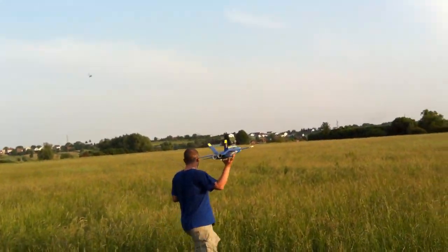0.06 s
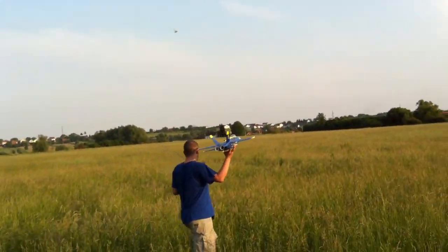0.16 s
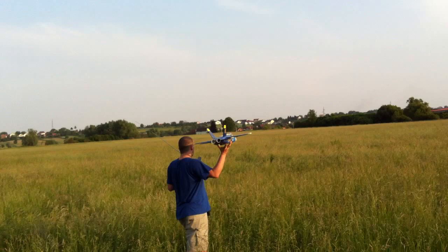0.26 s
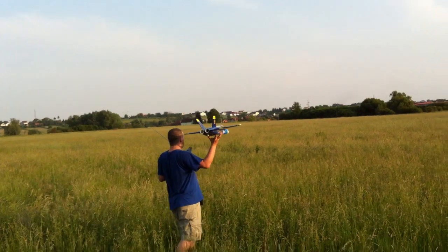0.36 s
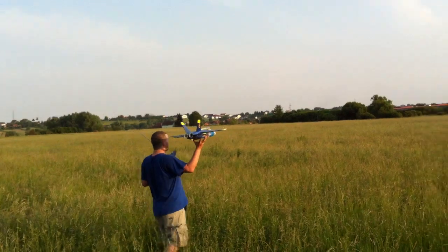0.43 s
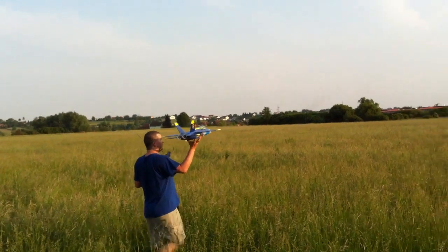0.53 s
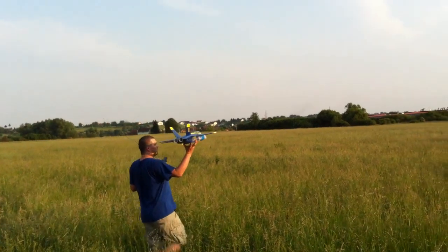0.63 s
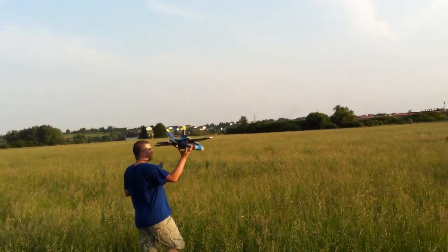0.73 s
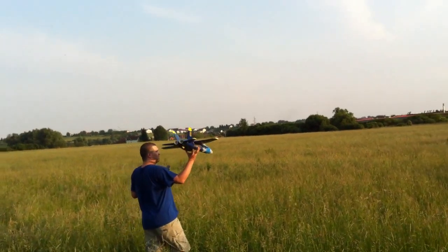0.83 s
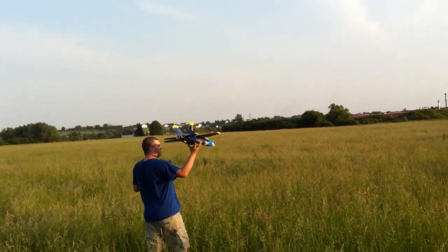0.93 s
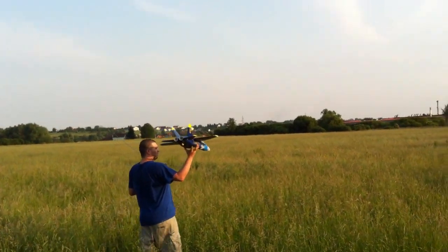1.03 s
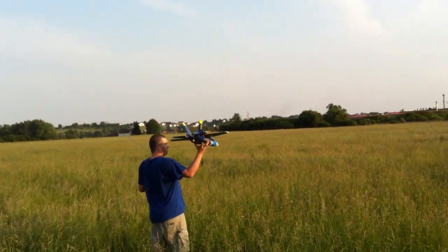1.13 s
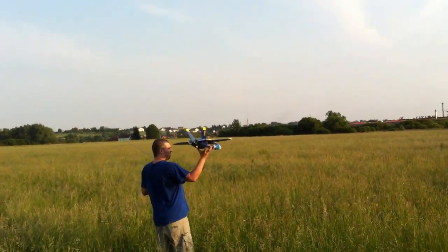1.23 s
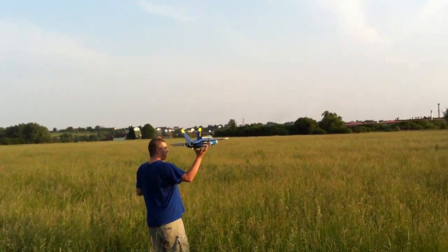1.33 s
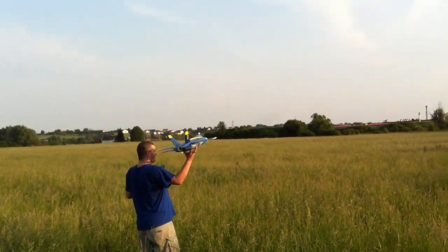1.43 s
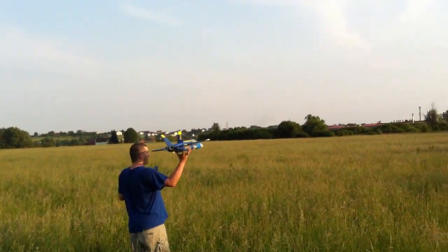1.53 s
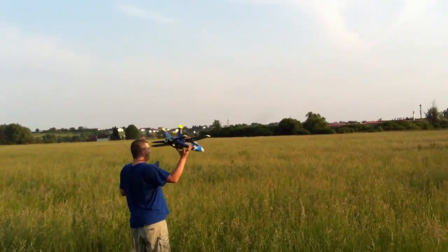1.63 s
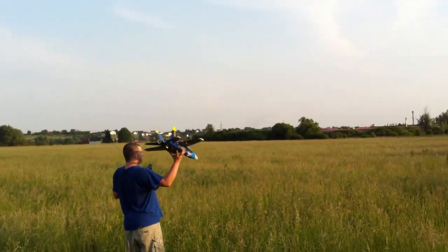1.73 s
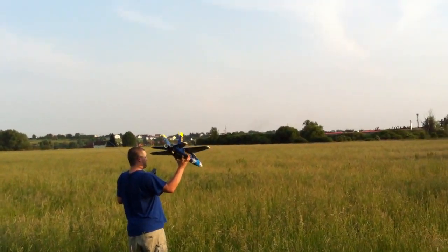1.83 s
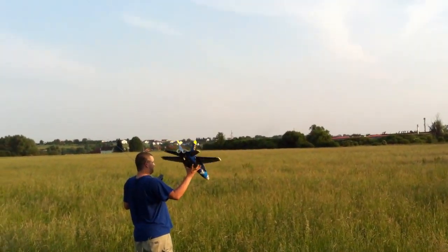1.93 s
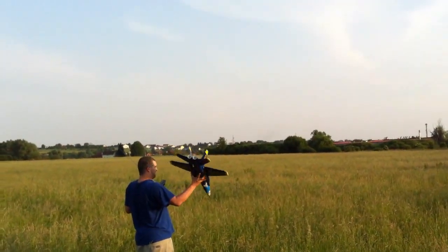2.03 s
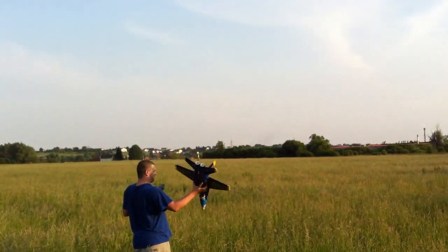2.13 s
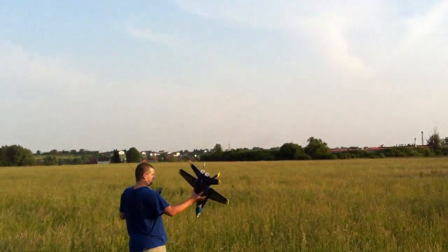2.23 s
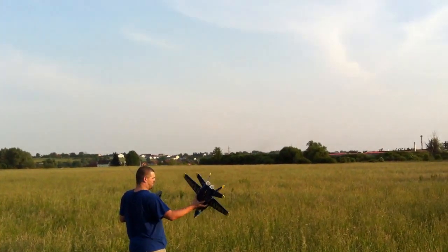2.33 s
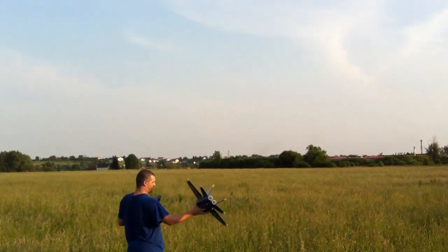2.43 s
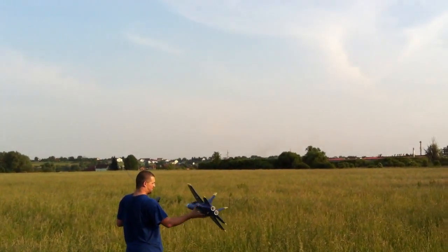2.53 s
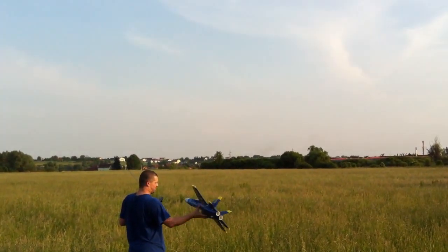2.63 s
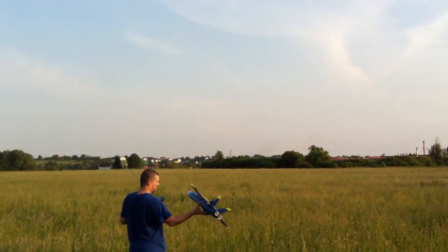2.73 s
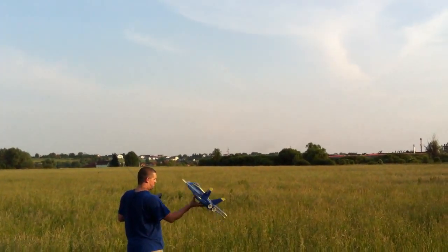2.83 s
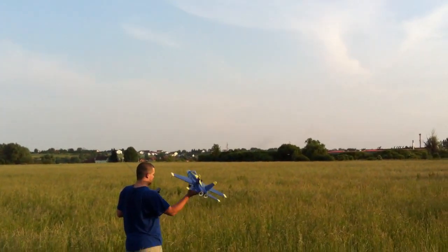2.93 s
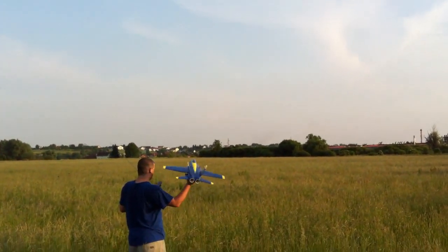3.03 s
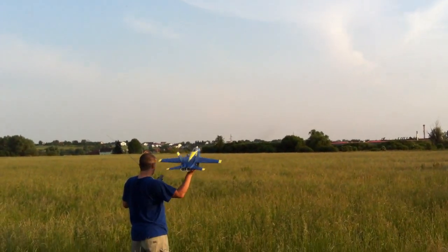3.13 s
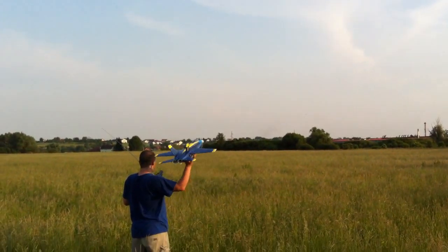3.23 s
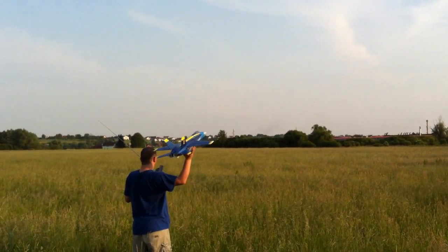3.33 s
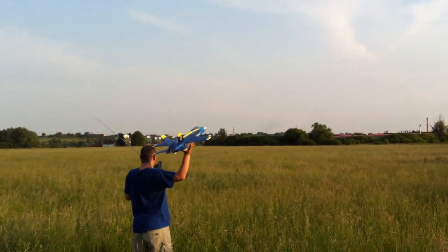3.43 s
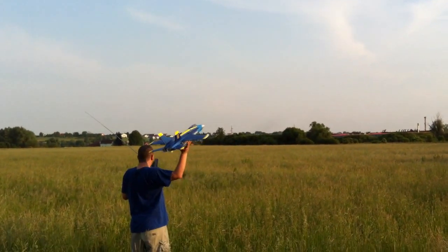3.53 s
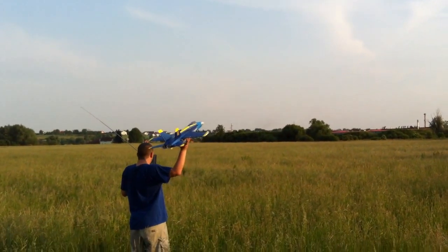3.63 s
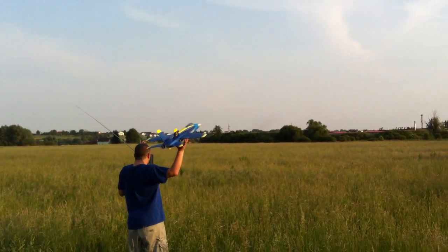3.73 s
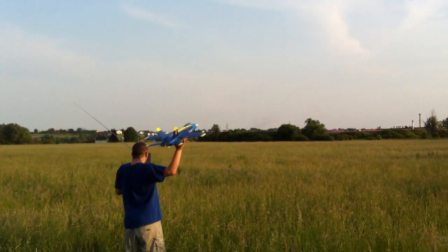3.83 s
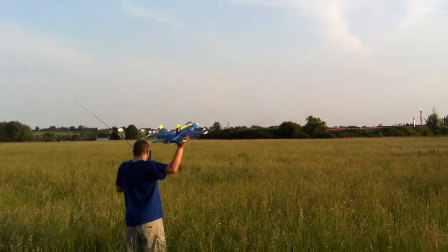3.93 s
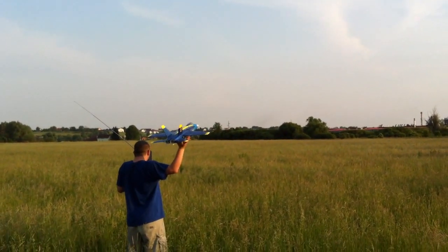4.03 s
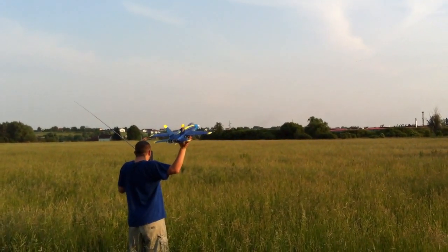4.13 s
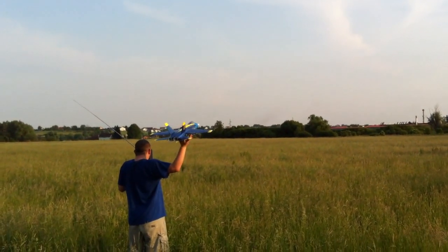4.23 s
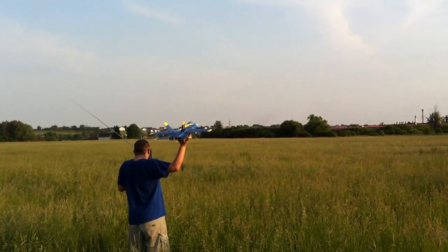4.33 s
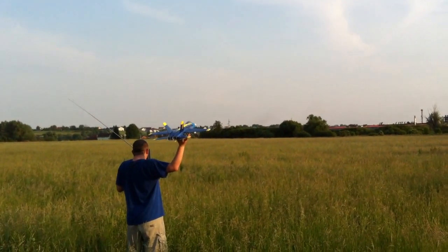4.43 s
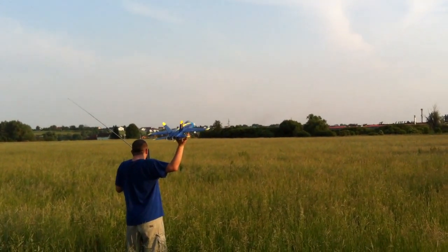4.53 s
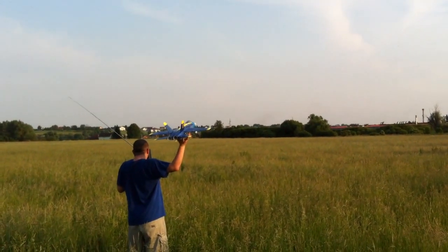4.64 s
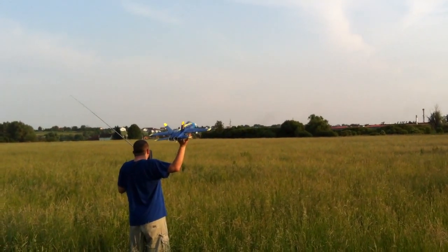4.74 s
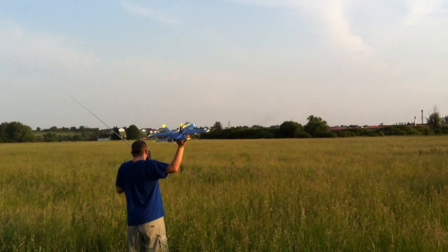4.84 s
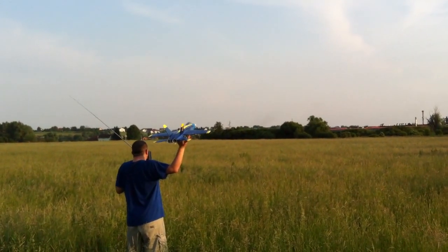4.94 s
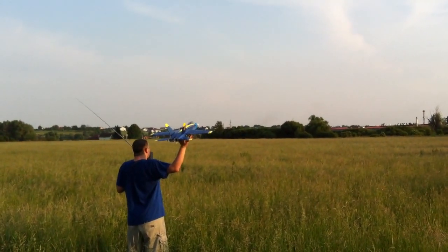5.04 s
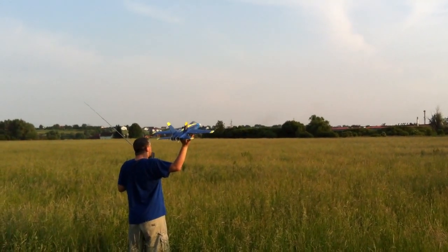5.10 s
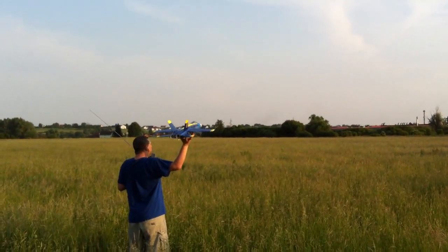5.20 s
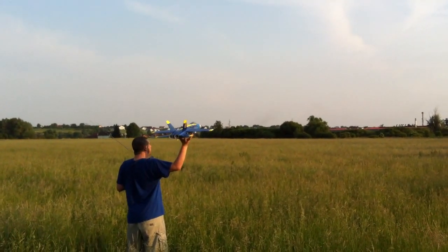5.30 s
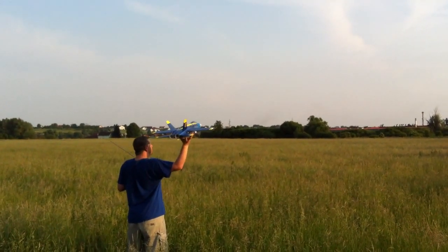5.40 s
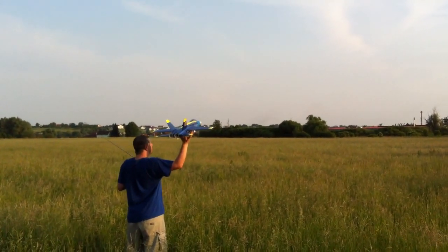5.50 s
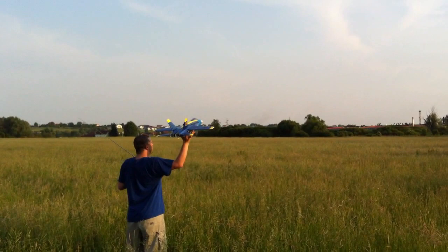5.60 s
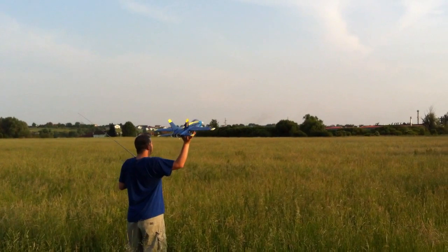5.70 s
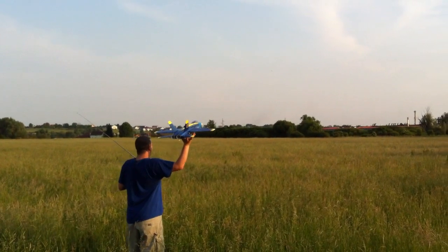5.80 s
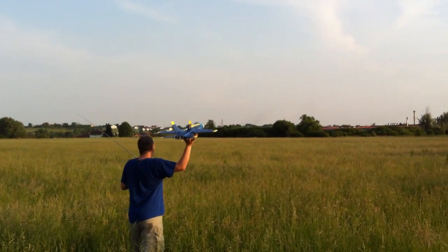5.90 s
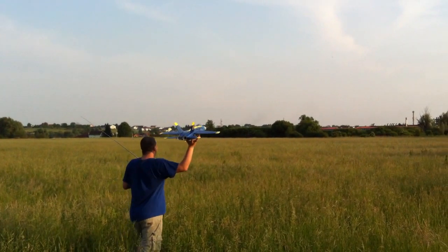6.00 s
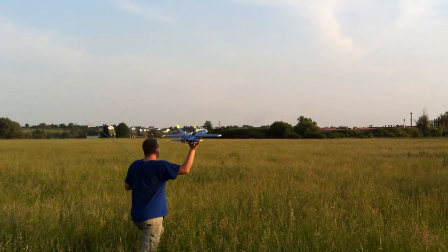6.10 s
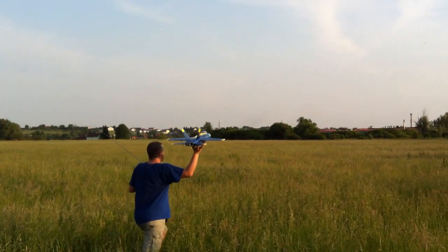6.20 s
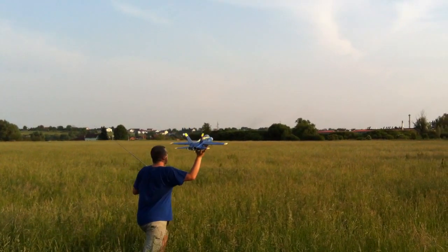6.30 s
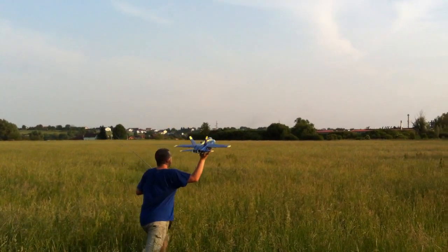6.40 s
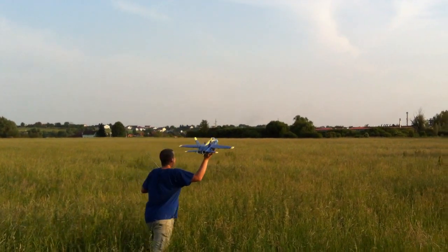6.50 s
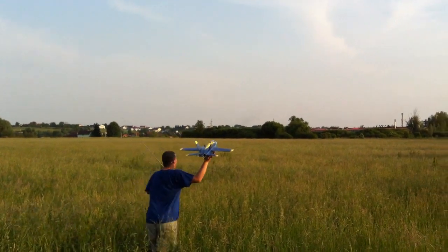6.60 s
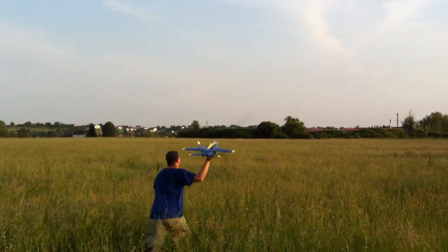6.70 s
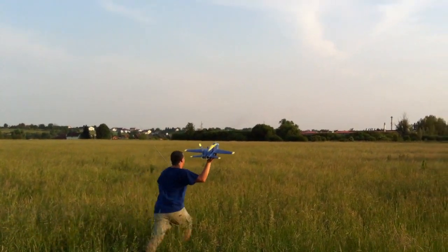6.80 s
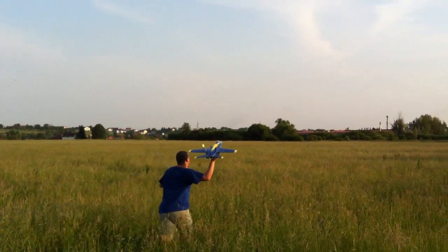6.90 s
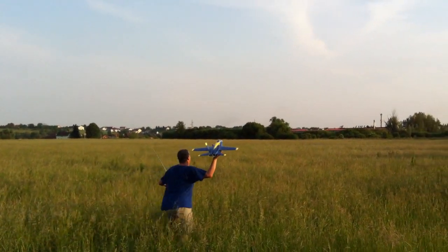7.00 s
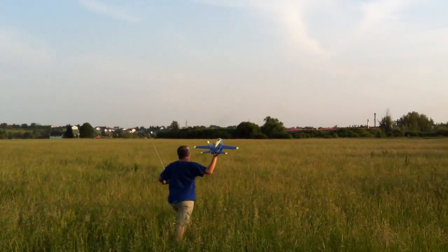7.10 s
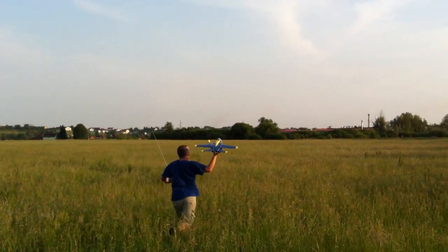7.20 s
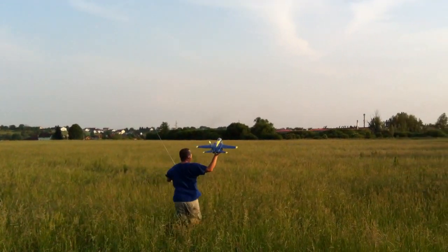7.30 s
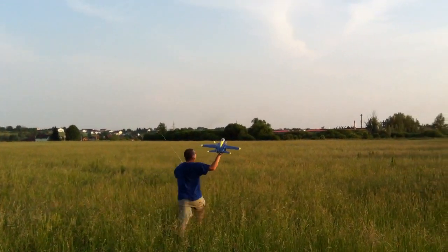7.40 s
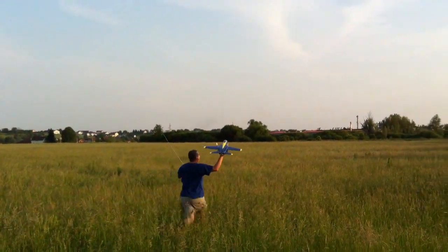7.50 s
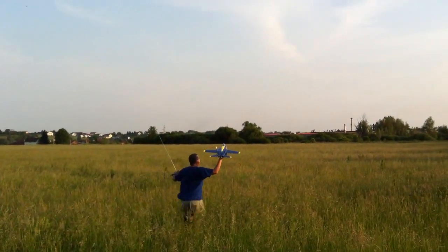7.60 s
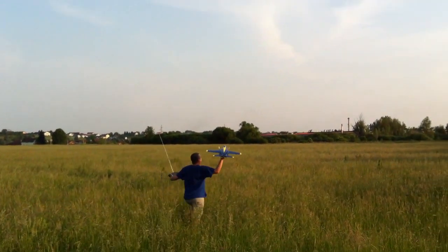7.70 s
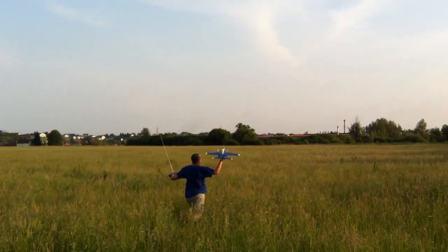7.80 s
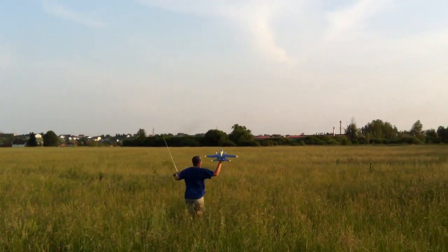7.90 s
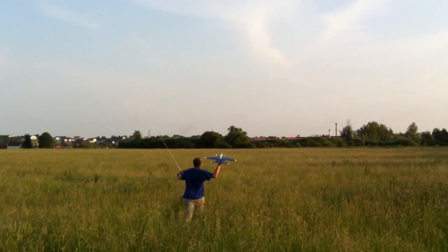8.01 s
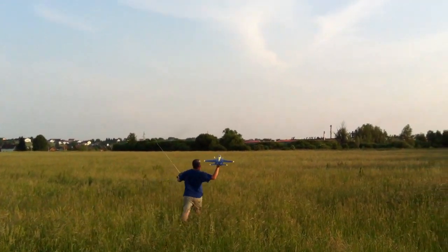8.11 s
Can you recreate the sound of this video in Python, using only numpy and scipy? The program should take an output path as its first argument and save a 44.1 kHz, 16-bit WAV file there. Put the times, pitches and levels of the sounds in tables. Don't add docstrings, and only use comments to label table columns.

```python
import sys
import numpy as np
from scipy import signal
from scipy.fft import rfft, irfft, next_fast_len
from scipy.io import wavfile
from scipy.ndimage import uniform_filter1d, map_coordinates

SR = 44100
rng = np.random.default_rng(int(sys.argv[2]) if len(sys.argv) > 2 else 0)


def wav_record(signal):
    frames = np.transpose(np.atleast_2d(signal))
    bounded = np.clip(frames, -1, 1)
    quanta = np.round(bounded * 32767).astype(np.int16)
    wavfile.write(sys.argv[1], SR, quanta)


def boost(x):
    u = np.asarray(x, float) / 20
    return 10 ** u


N = 359415
T = np.arange(N) / SR

# f/Hz, level/dB [per Hz]
FIELD_SPECTRUM = [(15, -36), (25, -13), (53, -25.5), (179, 4.5), (255, -2), (674, -0.5), (958, -8.5),
                  (1600, -24.5), (2150, -20.5), (4010, -16), (4710, -13.5), (5390, -19.5), (15900, -24)]
# peak t/s, rise t/s, fall t/s, level/dB
SWISHES = [
    (0.0, .05, 0.19, -57.5),
    (.15, 0.046, 0.069, -55.5),
    (.45, 0.1, 0.3, -51.5),
    (.78, 0.067, 0.075, -54.5),
    (1.0, 0.15, 0.17, -61),
    (1.28, 0.02, 0.047, -51),
    (1.3, 0.15, 0.19, -53.5),
    (1.62, 0.014, .03, -62),
    (2.62, 0.0067, .006, -61),
]
# peak t/s, rise t/s, fall t/s, level/dB
SCUFFS = [(.1, .1, 0.087, -64), (.24, 0.013, 0.013, -54), (.33, 0.064, 0.18, -54.5),
          (.44, 0.049, 0.13, -49), (.565, .006, 0.055, -48), (.64, .04, 0.054, -49),
          (.79, 0.05, 0.043, -53), (1.24, 0.12, 0.71, -57.5), (1.62, 0.011, 0.12, -57),
          (2.502, 0.065, 0.36, -61), (3.86, 0.063, 0.62, -57.5)]
# peak t/s, rise t/s, fall t/s, level/dB, peak f/Hz
WHOOSHES = [
    (0.469, 0.0045, .008, -52.5, 1500),
    (.565, 0.0058, .05, -51, 1360),
    (.645, .07, .07, -51.5, 1646),
    (.74, 0.055, .05, -58.5, 1649),
    (1.25, .1, .3, -63.5, 1710),
    (2.5, .12, .15, -62.5, 1630),
    (3.4, .15, .2, -67, 1720),
    (3.9, .08, .4, -62, 1820),
    (4.499, .15, .25, -64, 1776),
    (4.88, .12, .3, -60, 1696),
]
# first stroke t/s, last stroke t/s, peak level/dB
NEAR_CHIRPS = [(0.058, 0.166, -45.5), (0.327, 0.424, -45.5), (.5921, 0.694, -45.5), (.8779, 0.978, -45),
               (1.169, 1.271, -43.5), (1.608, 1.708, -43), (2.029, 2.13, -44.5), (2.286, 2.388, -44),
               (2.559, 2.657, -43.5), (2.835, 2.935, -43), (3.124, 3.156, -43.5), (3.433, 3.537, -43.5),
               (3.709, 3.8116, -43.5), (4.0003, 4.101, -44), (4.281, 4.386, -43.5), (4.6104, 4.713, -44),
               (4.9137, 5.015, -44)]
# first stroke t/s, last stroke t/s, peak level/dB, f/Hz
NEIGHBOUR_CHIRPS = [(.02, .11, -55.5, 4830), (.262, .262, -60, 4830), (.452, .452, -53, 4400),
                    (1.12, 1.155, -57, 4740), (1.35, 1.35, -58, 4830), (1.517, 1.585, -58, 4930),
                    (1.76, 1.76, -60, 4800), (1.832, 1.97, -60, 4930), (2.171, 2.2453, -52.5, 4710),
                    (2.5102, 2.5426, -51, 4700), (2.695, 2.695, -57, 4870), (2.91, 2.945, -52, 4830),
                    (2.981, 2.981, -47.5, 4700), (3.014, 3.014, -56, 4830), (3.21, 3.395, -61, 4880),
                    (3.568, 3.592, -66, 4770), (3.625, 3.653, -56.5, 4810), (3.8546, 3.8911, -51.5, 4740),
                    (3.98, 3.98, -55, 4870), (4.132, 4.1994, -51, 4680), (4.4333, 4.4682, -51, 4700),
                    (4.7538, 4.7925, -51.5, 4660), (5.0434, 5.0434, -53, 4650)]
# t/s, peak level/dB, f/Hz
TICKS = [(0.238, -47, 635), (0.306, -38.5, 1000), (0.452, -32, 4100), (0.469, -33.5, 1550),
         (0.52, -39, 3800), (0.561, -33.5, 1350), (0.603, -39, 1540), (1.281, -29, 8900), (1.615, -46, 910),
         (2.095, -52, 2800), (2.62, -51, 3200)]
# t/s, peak level/dB, f/Hz, glide [share of pitch]
LARK_NOTES = [(1.87, -69.5, 3830, -.15), (1.95, -65, 3000, .05), (2.41, -56, 3900, -0.022),
              (2.465, -57, 3500, .2), (2.62, -65, 3300, -.35), (2.945, -59, 3700, -0.11),
              (2.985, -61, 3550, .15), (3.12, -64, 3800, -.25), (3.14, -65, 2950, -.12),
              (3.2, -59, 3780, -0.16), (3.245, -58, 3530, 0.069), (3.295, -62, 3180, .25),
              (3.32, -64, 2900, -0.28), (3.385, -67, 3700, .05), (3.88, -59, 2900, -.25),
              (4.04, -64, 3800, -.2), (4.12, -58.5, 3800, -0.21), (4.155, -57, 3910, .2),
              (4.19, -68, 3200, -.15), (4.36, -59, 3730, .25), (4.44, -56, 4100, -.15),
              (4.5, -61, 3630, 0.17), (4.6, -65, 3660, 0.014), (3.84, -64, 3400, -.2),
              (4.41, -63, 3500, -.2), (4.46, -59, 3700, -.15), (4.53, -68, 3600, -.15),
              (3.33, -66, 4200, -.1), (2.925, -65, 3900, .1)]
# t/s, level/dB
WHISTLE = [
    (4.84, -41),
    (4.86, -40.5),
    (5.09, -31.5),
    (5.208, -37.5),
    (5.25, -44),
    (5.33, -56),
]
# t/s, f/Hz, level/dB
UPPER_SIDEBAND = [
    (4.87, 7970, -65),
    (4.94, 8240, -56),
    (5.08, 8940, -58),
    (5.14, 9400, -67),
]
# t/s, f/Hz, level/dB
LOWER_SIDEBAND = [
    (4.96, 6400, -79),
    (4.98, 6100, -70),
    (5.01, 5750, -69),
    (5.02, 5600, -74),
]
# f/Hz, width f/Hz, level/dB
WINDING_BUZZ = [
    (620, 180, -63.5),
    (960, 220, -59.5),
    (2090, 900, -65),
    (6520, 790, -61),
    (7740, 600, -57),
]
# t/s, shaft f/Hz, out-of-balance level/dB, blade tone level/dB; its tail faces us after 6 s
ROTOR = [(5.035, 140, -45, -65), (5.154, 325.7, -49.5, -46), (5.228, 456, -45.5, -35),
         (5.302, 582, -49, -36.5), (5.345, 640, -32, -32), (5.41, 719, -38.5, -26), (5.46, 737, -47, -39),
         (5.53, 743.5, -50.5, -29), (5.8, 742.3, -39, -28), (6.05, 736, -39, -35.5),
         (6.22, 736.7, -45.5, -36.5), (6.36, 734.5, -35, -30.5), (6.7, 731, -35, -41.5),
         (6.96, 732.8, -30.5, -43.5), (7.09, 725.3, -43, -38.5), (7.2, 724, -36, -42.5),
         (7.55, 723.3, -32.5, -39.5), (7.85, 719, -44.5, -46.5), (8.15, 714.5, -41, -41.5)]
# multiple of shaft, level/dB [over airflow], dB per halving of speed,
# dB per doubling of distance
STRONG_ORDERS = [(3, -8, 9.5, -2.5), (10, 0.1, -24, -2), (15, -4.5, -29, -9)]
# multiple of shaft, level/dB [re airflow]
WEAK_ORDERS = [(2, -16.5), (4, -14), (8, -13.5), (20, -19)]
# f/Hz, level/dB [per Hz]
AIR_SPECTRUM = [(35, -69), (60, -31.5), (307, -10.5), (502, -11), (649, -5.5), (729, -19.5), (800, -14),
                (1430, -14), (1810, -17.5), (2130, -14.5), (4200, -9), (5560, -15.5), (7350, -12.5),
                (14500, -22), (15900, -30)]
# t/s, distance/m
DISTANCE = [
    (5.6, 5.76),
    (6.3, 6.12),
    (6.8, 7.78),
    (7.3, 9.3),
    (7.8, 10.8),
    (8.15, 13.2),
]

BLADES = 5
FULL_HZ, FLOW_DB = 765, -35
FLOW_POWER, SPREAD = 2.12, 1.185
ECHO_LAG_MS, ECHO_DB, GRAZE_DB = 3.243, -8.5, 3
WHISTLE_HZ = 7920
NEAR_CRICKET_HZ = 4785
STROKE_S, QUICK_S = .035, .0035
WARMUP_DB, WARMUP_HZ, WARMUP_LEFT = -5.5, -75, 0.34
CLIMB, SAG_HZ_PER_S = .1, 330


def level(x, db):
    return x * boost(db) / np.sqrt(np.mean(x ** 2))


def curves(rows):
    s, *columns = np.transpose(rows)
    return [np.interp(T, s, column) for column in columns]


def colour(points):
    hz, db = np.transpose(points)
    size = next_fast_len(N)
    f = np.arange(size // 2 + 1) * SR / size + 1
    gain = boost(np.interp(np.log(f), np.log(hz), db))
    return level(irfft(rfft(rng.standard_normal(size)) * gain, size)[:N], 0)


def band(x, lo_hz, hi_hz, order=2):
    edges_hz = [lo_hz, min(hi_hz, .45 * SR)]
    return signal.sosfilt(signal.butter(order, edges_hz, "band", fs=SR, output="sos"), x)


def low_cut(x, hz=150, order=4):
    return signal.sosfilt(signal.butter(order, hz, "high", fs=SR, output="sos"), x)


def walk(rate):
    hold = int(SR / rate)
    held = np.repeat(rng.standard_normal(N // hold + 1), hold)
    return 1.3 * uniform_filter1d(uniform_filter1d(held, hold), hold)[:N]


def tone(hz, db):
    return np.sqrt(2) * boost(db) * np.sin(2 * np.pi * np.cumsum(hz) / SR)


def add(out, s, grain):
    i = int(s * SR)
    out[i:i + len(grain)] += grain[:N - i]


def swells(rows, rest_db):
    powers = []
    for s, rise, fall, db, *_ in rows:
        rising = np.exp(-((T - s) / rise) ** 2)
        falling = np.exp(-2 * np.maximum(T - s, 0) / fall)
        powers.append(boost(2 * db) * np.where(T < s, rising, falling))
    return np.sqrt(sum(powers) + boost(2 * rest_db)), powers


def grass():
    swish_gain, _ = swells(SWISHES, rest_db=-73.5)
    scuff_gain, _ = swells(SCUFFS, rest_db=-67)
    grains = rng.exponential(size=N // 20 + 1).repeat(20)[:N]
    crackle = boost(2.2 * np.minimum(grains, 5))
    swish = level(band(rng.standard_normal(N) * crackle, 1900, 18400, order=1), 0)
    scuff = level(band(rng.standard_normal(N), 270, 1780), 0)
    return swish * swish_gain * boost(0.48 * walk(31.5)) + scuff * scuff_gain * boost(-1.0 + 2.3 * walk(35))


def whoosh():
    gain, waves = swells(WHOOSHES, rest_db=-71.5)
    pitches = []
    for s, rise, fall, _, hz in WHOOSHES:
        climb = 1 - CLIMB * np.clip((s - T) / rise, 0, 1)
        pitches.append(hz * climb - SAG_HZ_PER_S * np.clip(T - s, 0, 2 * fall))
    centre_hz = np.average(pitches, axis=0, weights=np.add(waves, 1e-30))
    slow = level(band(rng.standard_normal((2, N)), 1, 140), 0)
    phase = 2 * np.pi * np.cumsum(centre_hz) / SR
    return (slow[0] * np.sin(phase) + slow[1] * np.cos(phase)) * gain * boost(-1.0)


def traffic():
    floor = colour(FIELD_SPECTRUM) * boost(-57 - 2.0 + 0.58 * walk(3.3))
    engine = level(band(rng.standard_normal(N), 55, 86), -77) * np.clip((1.3 - T) / 0.76, 0, 1)
    return floor + engine


def strokes(first_s, last_s, db, hz, warmup):
    k = np.arange(int(round((last_s - first_s) / STROKE_S)) + 1)
    early_s = QUICK_S * warmup * (k > 0) * (k < k[-1])
    cold = warmup * WARMUP_LEFT ** k
    times = np.linspace(first_s, last_s, len(k)) - early_s
    return zip(times, db + WARMUP_DB * cold, hz + WARMUP_HZ * cold)


def crickets():
    rows = [row for chirp in NEAR_CHIRPS for row in strokes(*chirp, NEAR_CRICKET_HZ, warmup=0.93)]
    rows += [row for chirp in NEIGHBOUR_CHIRPS for row in strokes(*chirp, warmup=0.274)]
    out = np.zeros(N)
    chance = rng.standard_normal((len(rows), 2))
    for (s, db, hz), (stretch, turn) in zip(rows, chance):
        length_s = (0.022 + 0.00069 * (db + 44.0)) * (1 + .05 * stretch)
        u = np.linspace(0, 1, int(length_s * SR))
        sag = 1.025 - 0.041 * u - 0.026 * u ** 4
        phase = 2 * np.pi * np.cumsum(hz * sag) / SR + turn * np.pi
        shape = np.sin(np.pi * u ** 1.35) ** .55
        add(out, s - .0055, boost(db) * shape * (np.sin(phase) + boost(-29) * np.sin(2 * phase)))
    chorus = level(band(rng.standard_normal(N), 4720, 4900), -70.5) * boost(4.5 * walk(28))
    out = out * boost(1.7 * walk(130))
    return out + 0.14 * np.roll(out, int(0.011 * SR)) + chorus


def ticks():
    out = np.zeros(N)
    t = np.arange(int(.02 * SR)) / SR
    cracks = rng.standard_normal((len(TICKS), len(t)))
    for (s, db, hz), crack in zip(TICKS, cracks):
        ring = np.sin(2 * np.pi * hz * t) + 0.36 * np.sin(2 * np.pi * 0.58 * hz * t)
        damped = ring * np.exp(-t * hz / 4.0)
        add(out, s, boost(db) * (damped + 0.43 * crack * np.exp(-t / 0.0011)))
    return low_cut(out, hz=280)


def lark():
    out = np.zeros(N)
    u = np.linspace(0, 1, int(0.0316 * SR))
    for s, db, hz, glide in LARK_NOTES:
        phase = 2 * np.pi * np.cumsum(hz * (1 + glide * (u - .5))) / SR
        add(out, s - .004, boost(db - 5.5) * np.sin(np.pi * u) * np.sin(phase))
    out = out * boost(2.7 * walk(150))
    return out + 0.51 * np.roll(out, int(.017 * SR)) + 0.24 * np.roll(out, int(0.046 * SR))


def controller():
    whistle_db, = curves(WHISTLE)
    gap = 1 - 0.98 * np.exp(-((T - 4.853) / 0.004) ** 2)
    on = (T > 4.841) * (T < WHISTLE[-1][0]) * gap
    whistle = tone(np.full(N, WHISTLE_HZ), whistle_db + 0.48 * walk(60))
    buzz = np.zeros(N)
    for hz, width_hz, db in WINDING_BUZZ:
        noise = band(rng.standard_normal(N), hz - width_hz / 2, hz + width_hz / 2)
        buzz += level(noise, db) * boost(5.4 * walk(40))
    buzz = buzz * np.clip((5.15 - T) / 0.077, 0, 1)
    sidebands = np.zeros(N)
    for rows in (UPPER_SIDEBAND, LOWER_SIDEBAND):
        sidebands += (T > rows[0][0]) * (T < rows[-1][0]) * tone(*curves(rows))
    return on * (whistle + buzz) + sidebands * boost(3.8 * walk(70))


def flight():
    shaft_hz = uniform_filter1d(curves(ROTOR)[0], SR // 30)
    steady = np.clip((T - 5.5) / .2, 0, 1)
    far = np.log2(curves(DISTANCE)[0] / DISTANCE[0][1])
    slow = np.log2(FULL_HZ / shaft_hz) * (1 - steady)
    flow_db = FLOW_DB - 20 * np.log10(2) * (FLOW_POWER * slow + SPREAD * far)
    return shaft_hz, steady, far, slow, flow_db


def rotor_tones(shaft_hz, steady, far, slow, flow_db):
    _, shaft_db, blade_db = curves(ROTOR)
    flutter_db = 4.5 - 2.0 * steady
    early_db = 14 * np.clip((5.33 - T) / 0.52, 0, 1)
    orders = [(1, shaft_db), (BLADES, blade_db)]
    for k, db, slow_db, far_db in STRONG_ORDERS:
        orders.append((k, flow_db + db + slow_db * slow + far_db * far + 0.59 * walk(6.5)))
    lines = np.zeros(N)
    for k, db in orders:
        flutter = flutter_db * np.minimum(walk(60), .9)
        lines += tone(k * shaft_hz * (1 + 0.00053 * walk(40)), db - 1.0 + flutter)
    for k, db in WEAK_ORDERS:
        weak_db = flow_db + db - early_db + 3.7 * walk(25)
        lines += tone(k * shaft_hz * (1 + 0.00223 * walk(50)), weak_db)
    return lines * np.clip((T - ROTOR[0][0]) / 0.034, 0, 1)


def tilt(slow, far, slow_db, far_db):
    return boost(slow_db * slow + far_db * far + .6 * walk(3.1) + 0.39 * walk(9))


def rushing_air(slow, far, flow_db):
    air = colour(AIR_SPECTRUM)
    air = air / np.std(band(air, 5200, 7000, order=4))
    low = signal.sosfilt(signal.butter(2, 750, fs=SR, output="sos"), air)
    high = low_cut(air, hz=8000, order=2)
    rumble = boost(-0.5) * low * tilt(slow, far, slow_db=-3.5, far_db=0)
    middle = (air - low - high) * boost(0.36 * walk(14))
    hiss = boost(0.3) * high * tilt(slow, far, slow_db=5, far_db=1)
    return (rumble + middle + hiss) * boost(flow_db - 1.5) * np.clip((T - 5.0) / 0.068, 0, 1)


def ground_echo(air, far):
    lag_ms = ECHO_LAG_MS / 2 ** far
    delayed = map_coordinates(air, [np.arange(N) - lag_ms * SR / 1000], order=1)
    return boost(ECHO_DB + GRAZE_DB * far) * band(delayed, 28.0, 1200)


def fan():
    shaft_hz, steady, far, slow, flow_db = flight()
    lines = rotor_tones(shaft_hz, steady, far, slow, flow_db)
    air = rushing_air(slow, far, flow_db)
    return low_cut(lines + air + ground_echo(air, far))


def scene():
    mono = grass() + whoosh() + traffic() + crickets() + ticks() + lark() + controller() + fan()
    return np.array([mono, mono])


def band_limit(x):
    return signal.sosfilt(signal.butter(12, 16030, fs=SR, output="sos"), x)


def record(dry):
    return band_limit(dry)


dry = scene()
out = record(dry)
wav_record(out)
```